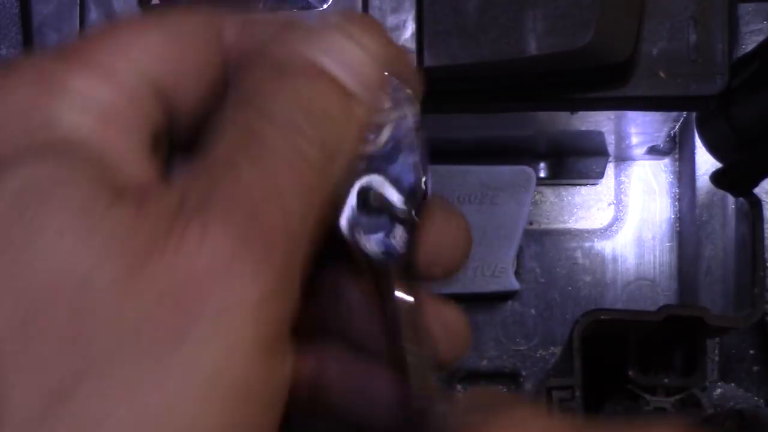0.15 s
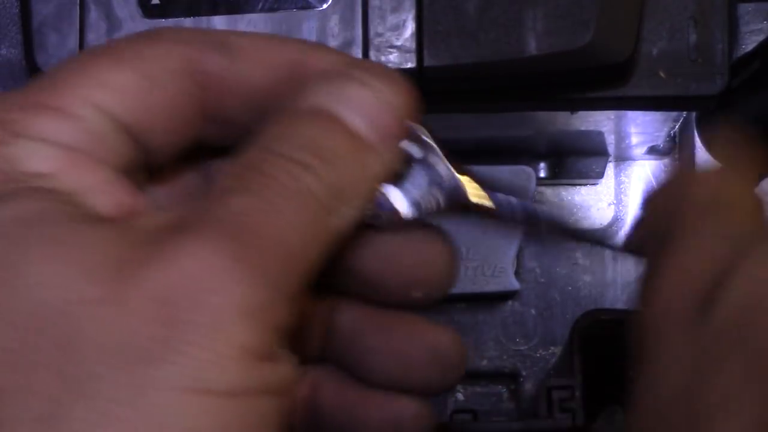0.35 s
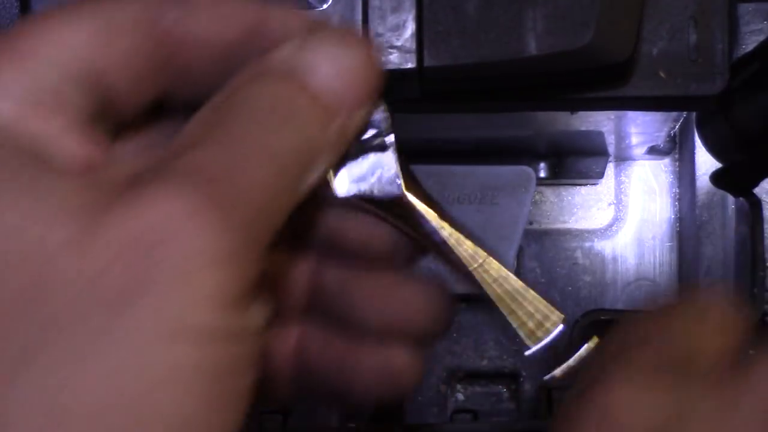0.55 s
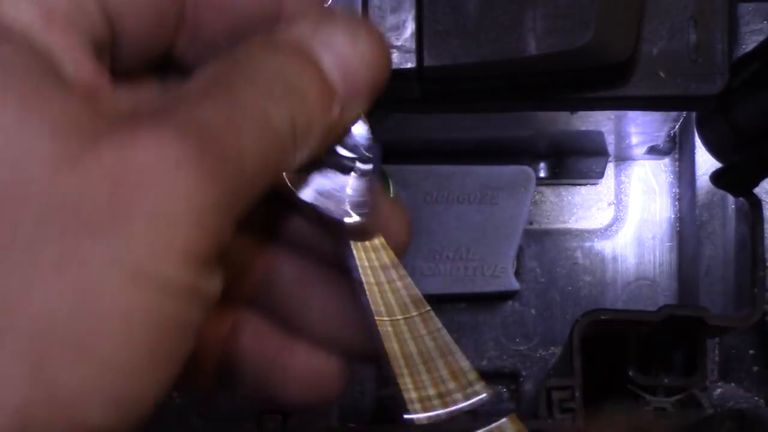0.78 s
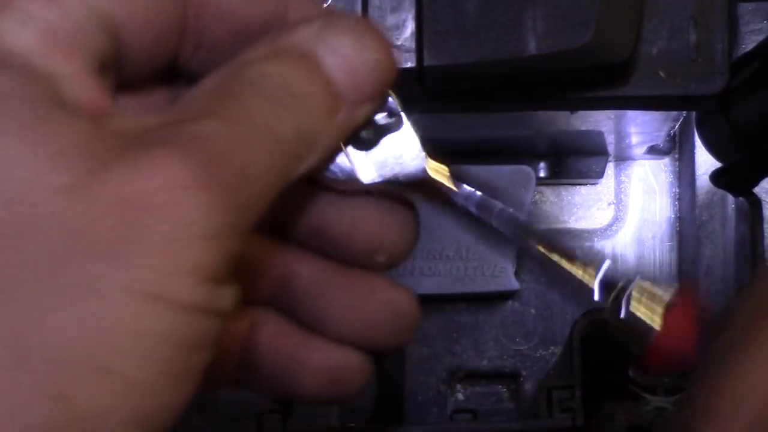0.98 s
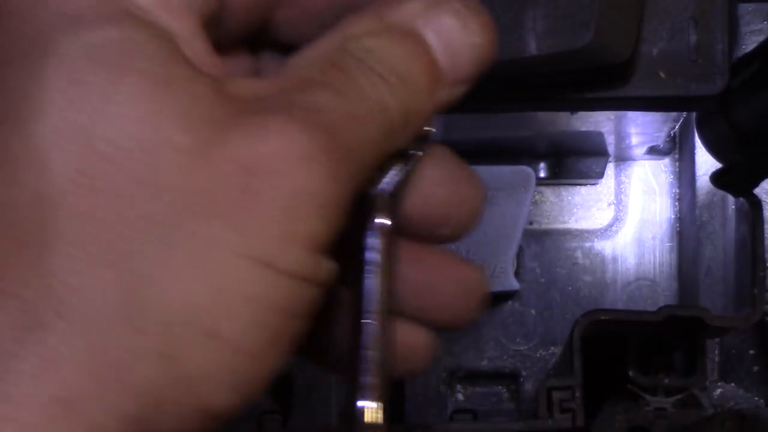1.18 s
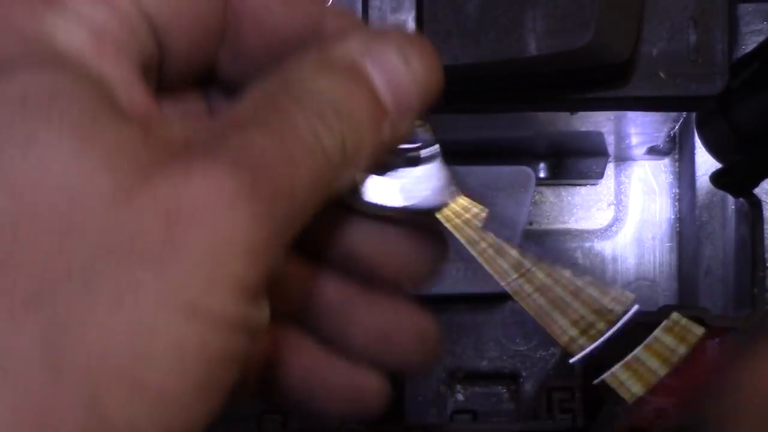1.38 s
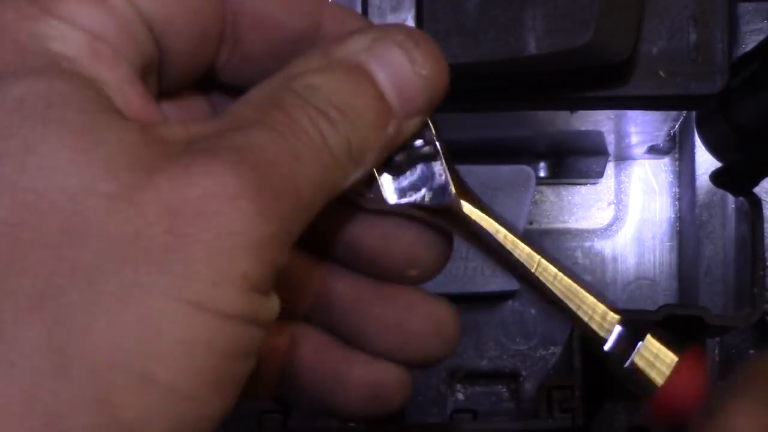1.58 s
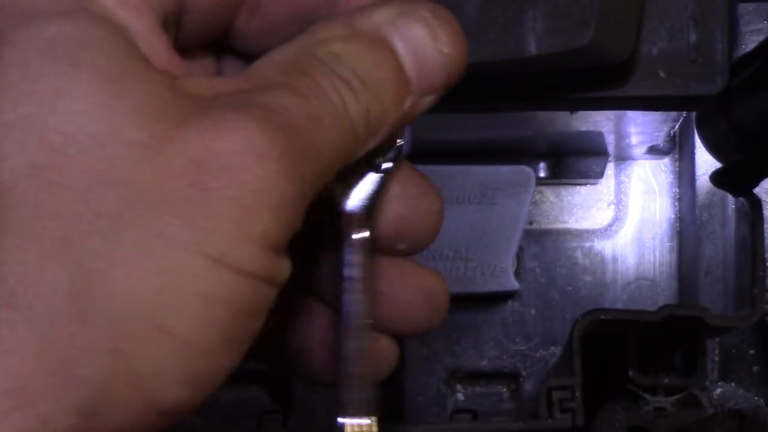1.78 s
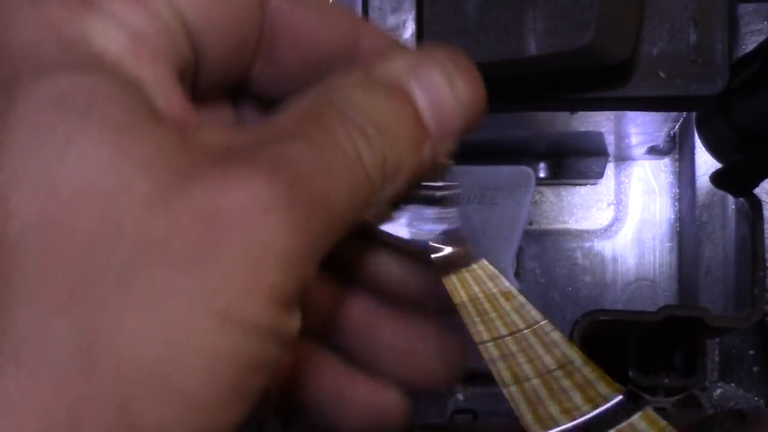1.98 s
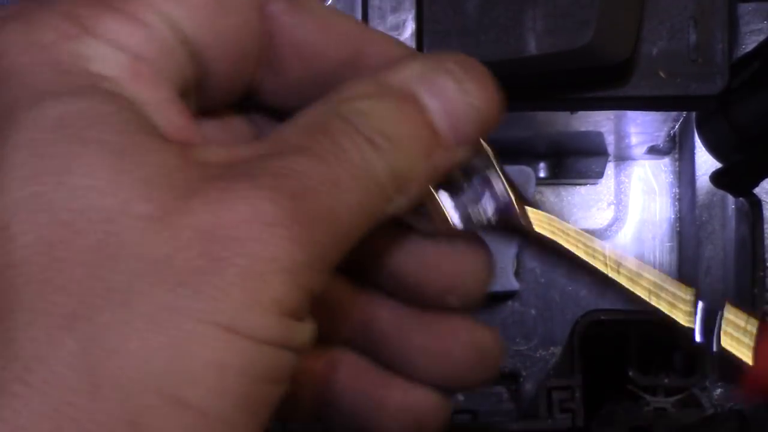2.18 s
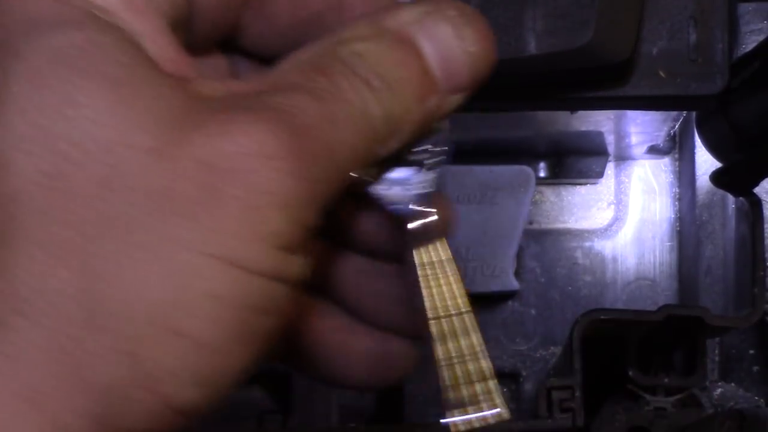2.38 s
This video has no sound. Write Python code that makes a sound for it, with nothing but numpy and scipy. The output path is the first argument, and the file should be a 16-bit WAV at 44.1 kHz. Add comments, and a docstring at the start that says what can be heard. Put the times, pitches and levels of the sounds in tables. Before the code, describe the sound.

Four fast metallic ratchet zips, with dull socket knocks and scuffs between them, heard very close

```python
"""In an engine bay, close to the microphone, a hand ratchet works a bolt in a plastic housing.
On each of four back swings the pawl snaps over about eleven teeth: noise bursts ring modes of head, socket and housing.
The loose socket knocks and ticks, by blows on its modes, and scuffs by sparse random slips that ring the thud modes.
On the drive strokes the tool rubs under the hand, as swells of coloured noise.
Behind lie the quiet garage, a slowly drifting coloured noise, and its short, dull echo."""
import sys
import numpy as np
from scipy import signal
from scipy.fft import rfft, irfft
from scipy.io import wavfile
from scipy.ndimage import uniform_filter1d

SR = 44100
rng = np.random.default_rng(int(sys.argv[2]) if len(sys.argv) > 2 else 0)


def persist_wave(psi):
    """Save psi, clipped to +-1, as 16-bit WAV."""
    counts = np.round(np.clip(psi, -1, 1) * 32767).astype(np.int16)
    wavfile.write(sys.argv[1], SR, np.atleast_2d(counts).T)


N = 108045

# modes of the steel head: (frequency [Hz], width [Hz], relative level [dB])
HEAD_MODES = [(6230,170,-15.5),(7570,130,8),(8155,500,9.5),(8740,130,3.5),(11100,460,-8),(12000,290,-4.5),(14100,81,4)]
# modes of the socket: (frequency [Hz], width [Hz], relative level [dB])
SOCKET_MODES = [(2925,53,12),(3490,146,10.5),(3856,370,4.5),(4310,190,6.5),(4445,270,3),(4750,310,5.5),(5975,210,1)]
# modes rung by thuds and scuffs: (frequency [Hz], width [Hz], relative level [dB])
THUD_MODES = [(140,45,-4),(193,115,-2.5),(283.6,27,2),(467,162,2),(578,50,3),(773,45,6),(1030,118,1.5),(1227,45,-15),(1590,100,-12)]
RING_S = 0.09  # length computed for each blow


def undb(db):
    """Amplitude ratio: twenty decibels make a factor of ten."""
    return 10 ** (np.asarray(db) / 20)


def unit(x):
    """Normalization: scale to rms 1."""
    return x / np.sqrt(np.mean(x ** 2))


def add(out, s, x):
    """Superposition: mix x in at time s."""
    i = max(int(s * SR), 0)
    out[i:i + len(x)] += x[:max(N - i, 0)]


def walk(rate):
    """Smooth random drift, spread near 1: twice-averaged random steps, rate of them per second."""
    k = int(SR / rate)
    steps = np.repeat(rng.standard_normal(N // k + 1), k)
    smooth = uniform_filter1d(uniform_filter1d(steps, k), k)
    return 1.37 * smooth[:N]


def colour(x, points):
    """Spectral shaping by (Hz, dB) points, interpolated along log frequency, to rms 1."""
    hz, db = np.array(points).T
    f = np.fft.rfftfreq(len(x), 1 / SR) + 1
    gain = undb(np.interp(np.log(f), np.log(hz), db))
    return unit(irfft(rfft(x) * gain, len(x)))


def lowpass(x, hz):
    """First-order relaxation: a gentle one-pole low-pass."""
    p = np.exp(-2 * np.pi * hz / SR)
    return signal.lfilter([1 - p], [1, -p], x)


def steep_lowpass(x, hz):
    """Third-order Butterworth low-pass."""
    return signal.sosfilt(signal.butter(3, hz, fs=SR, output="sos"), x)


def highpass(x, hz):
    """Second-order Butterworth high-pass."""
    return signal.sosfilt(signal.butter(2, hz, "high", fs=SR, output="sos"), x)


def swells(rows):
    """Hyperbolic-secant level of movements that speed up and slow down: (peak s, dB, rise s, fall s)."""
    t, level = np.arange(N) / SR, np.zeros(N)
    for s, db, rise, fall in rows:
        distance = abs(t - s) / np.where(t < s, rise, fall)  # 1 is 7 dB below the peak
        level += undb(db) / np.cosh(np.minimum(1.49 * distance, 20))
    return level


def resonances(modes, f, shift_hz=0):
    """Damped-oscillator response of each mode at the frequencies f, its pitch moved by shift_hz."""
    hz, width, db = np.array(modes).T[:, :, None]
    moved_hz = hz + np.reshape(shift_hz, (-1, 1))
    return undb(db) / (1 + 1j * (f * f - moved_hz ** 2) / (f * width))


def favour(modes, centres_hz, lifts_db):
    """Selective excitation: lift in dB, per blow and mode, of modes near the pitch the contact favours."""
    octaves = np.log2(np.array(modes)[:, 0] / centres_hz[:, None])
    width_octaves = 0.64
    return np.reshape(lifts_db, (-1, 1)) * np.exp(-(octaves / width_octaves) ** 2)


def strike(times, levels_db, modes, rise_s, decay_s, tail_db, tail_s, crack_db, lift_db=0, scatter_db=5):
    """Modal excitation: a blow and its swarm of engine-bay reflections drive the modes, with a noisy crack."""
    level_s = 0.006  # span whose energy sets the level of the ring
    alike = 0.2  # share of the reflections' power that carries over to the next blow
    drift_hz, crack_low_hz, crack_top_hz = 14, 2600, 9200
    n = int(RING_S * SR)
    t, f = np.arange(n) / SR, np.fft.rfftfreq(2 * n, 1 / SR) + 1
    balances = undb(lift_db + scatter_db * rng.standard_normal((len(times), len(modes))))
    early = np.exp(-t / decay_s)
    swarm = (1 - np.exp(-t / rise_s)) * (early + undb(tail_db) * np.exp(-t / tail_s))
    paths, out = rng.standard_normal(n), np.zeros(N)
    for s, db, balance in zip(times, levels_db, balances):
        fresh, grit = rng.standard_normal((2, n))
        # the grip shifts from blow to blow
        shapes = resonances(modes, f, drift_hz * rng.standard_normal(len(modes)))
        paths = np.sqrt(alike) * paths + np.sqrt(1 - alike) * fresh
        ring = unit(irfft(rfft(paths * swarm, 2 * n) * (balance @ shapes))[:n])
        crack = lowpass(lowpass(grit * early, crack_top_hz), crack_top_hz)
        crack = unit(crack - lowpass(crack, crack_low_hz))
        blow = ring + undb(crack_db) * crack
        add(out, s, blow * undb(db) * np.sqrt(level_s / RING_S))
    return out


def garage():
    """Stationary coloured noise: a slightly restless mid and a weaker, independent left-right difference."""
    # background spectrum: (frequency [Hz], relative level per Hz [dB])
    background_spectrum = [(15, -68), (25, -43), (111, -7), (309, -4), (476, -3.5), (607, -8), (1160, -11),
                           (1260, -15), (2160, -14.5), (2410, -16.5), (8590, -29), (16000, -41)]
    level = undb(-51.5)
    mid = colour(rng.standard_normal(N), background_spectrum)
    side = colour(rng.standard_normal(N), background_spectrum)
    side = undb(-35) * lowpass(side, 48) + undb(-15.5) * side  # slightly fuller in the deepest bass
    return level * mid * undb(0.25 * walk(30.9)), level * side


def rubbing():
    """Friction noise: a fine, uneven hiss swells as the head turns under the hand on the drive strokes."""
    # rubs: (time of peak [s], level [dB], rise [s], fall [s])
    rubs = [(.02,-47.5,0.033,0.072),(.69,-43.5,0.059,0.049),(1.179,-42.5,0.055,0.059),(1.73,-49.5,0.062,0.1),(2.42,-54.5,0.085,0.073)]
    # hiss spectrum: (frequency [Hz], relative level per Hz [dB])
    hiss_spectrum = [(240, -41), (400, -23), (570, 7.5), (666, -13), (765, 2), (1350, -0.5), (4440, -4.5),
                     (9760, -15.5), (16000, -30)]
    grain_db = 2 * np.minimum(rng.exponential(size=N), 4)
    grains = rng.standard_normal(N) * undb(grain_db)
    flutter = undb(1.6 * walk(90))
    return swells(rubs) * flutter * colour(grains, hiss_spectrum)


def slack():
    """Impact in a loose joint: the socket bumps the housing with a thud and a harder clack, or ticks."""
    # knocks: (time [s], thud level before trim [dB], clack level before trim [dB], favoured pitch [Hz])
    knocks = [(0.151,-47,-46,293),(.215,-29,-60,990),(.234,-30,-60,288),(0.543,-42,-50,1030),(.560,-29.5,-33,1050),(0.571,-23.5,-26.5,530),(.581,-39.5,-60,694),(.644,-36.5,-29.5,790),(0.682,-20.5,-33,425),(0.688,-31.5,-58,810),(0.698,-42,-55,204),(0.81,-40.5,-71,554),(.944,-22.5,-35,577),(1.002,-41,-36,1000),(1.029,-37,-30,905),(1.055,-37,-35.5,1000),(1.447,-30.5,-53,810),(1.482,-31.5,-55,780),(1.551,-39.5,-34.5,1000),(1.586,-28.5,-35,890),(1.607,-26,-28,487),(1.614,-25,-50,1220),(1.989,-38.5,-66,1200),(2.100,-25.5,-37,660),(2.211,-35.5,-40,1030),(2.229,-31,-37,1210),(2.241,-40.5,-37,440)]
    # light ticks of steel on steel: (time [s], level before trim [dB])
    tick_rows = [(0.57,-51),(0.645,-37.5),(1.176,-38),(1.815,-56),(1.833,-45.5),(1.868,-55),(2.365,-47),(2.393,-51.5)]
    # modes of the clack: (frequency [Hz], width [Hz], relative level [dB])
    clack_modes = [(1100,400,23),(1645,280,18.3),(2170,690,20),(3000,150,4.9)]
    thud_trim_db, clack_trim_db, tick_trim_db = -1, -3.5, -2.5
    s, thud_db, clack_db, contact_hz = np.array(knocks).T
    lift = favour(THUD_MODES, contact_hz, 10)
    thud = strike(s, thud_db + thud_trim_db, THUD_MODES, rise_s=0.004, decay_s=0.0053,
                  tail_db=-18, tail_s=0.012, crack_db=-47, lift_db=lift, scatter_db=2)
    clack = strike(s, clack_db + clack_trim_db, clack_modes, rise_s=0.00055, decay_s=0.0055,
                   tail_db=-12, tail_s=0.014, crack_db=-42)
    s, tick_db = np.array(tick_rows).T
    ticks = strike(s, tick_db + tick_trim_db, SOCKET_MODES + HEAD_MODES, rise_s=0.00034, decay_s=0.0037,
                   tail_db=-31, tail_s=0.01, crack_db=-3)
    thud = highpass(highpass(steep_lowpass(thud, 1750), 180), 204)
    clack = lowpass(lowpass(clack, 4400), 3500)
    return thud + clack + ticks


def scuffing():
    """Stick-slip: as the handle turns, the socket scuffs the housing and sparse slips ring the thud modes."""
    # scuffs: (time of peak [s], level [dB], rise [s], fall [s], favoured pitch [Hz])
    scuffs = [(0.223,-36.5,0.021,0.0097,320),(.385,-45,0.089,0.045,570),(.555,-41,0.03,0.019,1000),(.585,-42.5,0.02,.014,337),(0.711,-41,.018,0.029,170),(.77,-50.5,.045,0.066,370),(1.058,-39,0.023,0.023,480),(1.358,-41,0.031,0.023,268),(1.601,-37,0.048,0.011,450),(1.983,-42,0.015,0.02,1330),(2.085,-38,0.057,0.018,613),(2.232,-37.5,0.032,0.029,1090)]
    slips_per_s = 700
    rows, out = np.array(scuffs), np.zeros(N)
    shapes = resonances(THUD_MODES, np.fft.rfftfreq(N, 1 / SR) + 1)
    lifts = favour(THUD_MODES, rows[:, -1], 13)
    for row, lift in zip(rows, lifts):
        slips = rng.standard_normal(N) * (rng.random(N) < slips_per_s / SR)
        ringing = unit(irfft(rfft(slips) * (undb(lift) @ shapes), N))
        out += swells([row[:-1]]) * ringing
    return highpass(steep_lowpass(out, 1890), 182)


def pawl():
    """Coupled resonators: at each snap the head rings at once, the socket and housing answer more slowly."""
    # pawl snaps, levels before trim: (time [s], steel head [dB], socket [dB], housing [dB])
    teeth = [(0.2772, -19.5, -29, -31.5), (0.295, -20.5, -26.5, -29.5), (0.3117, -21, -24.5, -31.5),
             (0.3301, -20.5, -32, -28.5), (0.3516, -23, -27.5, -34.5), (0.3687, -19.5, -28, -28.5),
             (0.383, -26, -33, -29.5), (0.397, -23, -43, -25), (0.412, -24, -25.5, -28.5),
             (0.4242, -22, -31.5, -29), (0.4469, -18, -28.5, -29), (0.8657, -14, -26, -32),
             (0.8766, -19.5, -27.5, -29), (0.886, -13, -26.5, -27.5), (0.8941, -20, -38, -24.5),
             (0.903, -16, -30, -28), (0.9104, -17.5, -31, -26.5), (0.9191, -18, -25, -28.5),
             (0.9282, -20.5, -37, -25), (0.9371, -44, -28, -27.5), (0.9568, -24.5, -25, -29.5),
             (1.394, -14.5, -33, -32), (1.4065, -20, -33, -30.5), (1.4175, -18, -27, -35),
             (1.4275, -23, -22.5, -35), (1.437, -25, -24.5, -25.5), (1.4458, -21, -32, -36),
             (1.4559, -20, -25.5, -31.5), (1.4653, -19, -26, -29), (1.4759, -20.5, -25.5, -28),
             (1.4881, -29, -26, -30), (1.508, -21, -22, -31), (2.0258, -18.5, -27, -29),
             (2.0373, -25.5, -27, -31.5), (2.0474, -16.5, -29, -33), (2.0565, -18, -27.5, -29.5),
             (2.0663, -18.5, -26, -31), (2.075, -20, -23.5, -28.5), (2.0849, -29, -25.5, -30),
             (2.0946, -22, -22, -27), (2.1108, -25, -22.5, -35), (2.1245, -17.5, -22, -37.5),
             (2.14, -18, -22, -27), (2.171, -22.5, -23.5, -28)]
    # back swings, the grip differing each time: (start [s], favoured housing pitch [Hz], lift [dB])
    swings = [(.27,1710,8),(.86,1820,15),(1.385,1230,3.5),(2.021,1080,1)]
    # modes of the housing: (frequency [Hz], width [Hz], relative level [dB])
    housing_modes = [(625,33,-2),(817,46,-5.5),(1079,40,5.5),(1222,67,0.5),(1313,53,0.5),(1504,48,0),(1619,30,-1.5),(1698,96,-4.5),(1920,52,-3),(2098,64,-3.5),(2240,103,-2),(2392,124,-5.5)]
    head_trim_db, socket_trim_db, housing_trim_db = -10, -3, 1
    s, head_db, socket_db, housing_db = np.array(teeth).T
    swing_rows = np.array(swings)
    swing = np.maximum(np.searchsorted(swing_rows[:, 0], s + 0.05) - 1, 0)  # the swing of each snap
    start, grip_hz, grip_db = swing_rows[swing].T
    lift = favour(housing_modes, grip_hz, grip_db)
    head = strike(s, head_db + head_trim_db, HEAD_MODES, rise_s=0.0003, decay_s=0.0018,
                  tail_db=-22, tail_s=0.0048, crack_db=-25)
    socket = strike(s, socket_db + socket_trim_db, SOCKET_MODES, rise_s=0.0011, decay_s=0.0016,
                    tail_db=-14.5, tail_s=0.01, crack_db=-11)
    housing = strike(s, housing_db + housing_trim_db, housing_modes, rise_s=0.0016, decay_s=0.0038,
                     tail_db=-17, tail_s=0.014, crack_db=-33, lift_db=lift)
    snaps = highpass(head, 1300) + highpass(socket, 1350) + highpass(housing, 220)
    return steep_lowpass(snaps, 14300) + singing(s, s - start)


def singing(times, into_swing_s):
    """Free decay: thin steel partials sing on after each snap, stronger as the swing goes on."""
    # partials: (frequency [Hz], peak level at full growth [dB], decay to 1/e [s])
    partials = [(13500,-38,0.0028),(7900,-52,0.0053)]
    growth_db_per_s, full_s = 134, 0.11  # growth ends full_s into the swing
    t, out = np.arange(int(RING_S * SR)) / SR, np.zeros(N)
    for s, into in zip(times, into_swing_s):
        ring = np.zeros(len(t))
        for hz, db, decay in partials:
            ring += undb(db) * np.exp(-t / decay) * np.sin(2 * np.pi * (hz * t + rng.random()))
        add(out, s, ring * undb(growth_db_per_s * min(into - full_s, 0)))
    return out


def room(x):
    """Reverberation: convolution with a short, dull, exponentially decaying noise tail of the garage."""
    t60_s, build_up_s, damp_hz = 0.22, 0.019, 3900
    t = np.arange(SR // 2) / SR
    envelope = 1000 ** (-t / t60_s) * (1 - np.exp(-t / build_up_s))
    tail = lowpass(rng.standard_normal(len(t)), damp_hz) * envelope
    return undb(-23) * signal.fftconvolve(x, tail / np.linalg.norm(tail))[:N]


def scene():
    """Mid-side superposition: the tool sits almost in the centre, with a little width from the room."""
    port_lag_s = 3.2e-6  # between the two microphone ports
    tool = pawl() + slack() + scuffing() + rubbing()
    mid, side = garage()
    lag_side = np.gradient(tool) * SR * port_lag_s / 2  # a small delay as a slope
    side = side + 0.064 * room(tool) + lag_side
    return tool + room(tool) + mid + side * np.array([[1], [-1]])


def record(dry):
    """Band limiting: the microphone thins the deep bass and cuts the top."""
    thin = highpass(dry, 30)
    return signal.sosfilt(signal.ellip(8, 0.2, 70, 15800, fs=SR, output="sos"), thin)


dry = scene()
out = record(dry)
persist_wave(out)
```